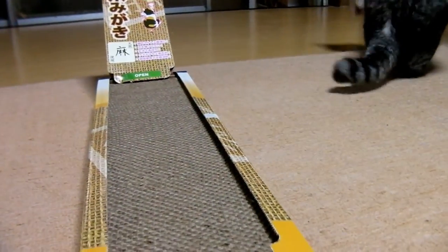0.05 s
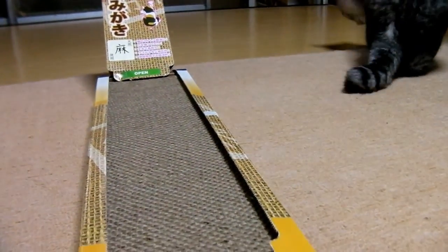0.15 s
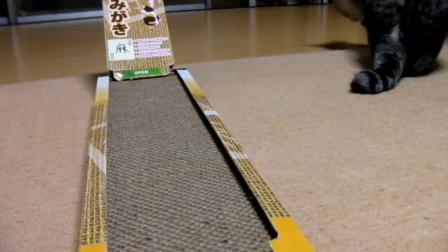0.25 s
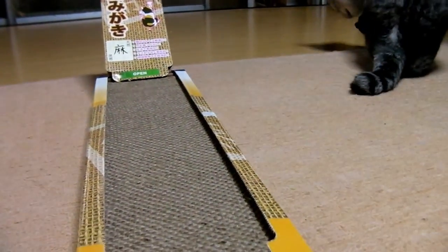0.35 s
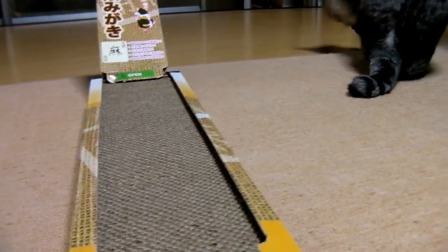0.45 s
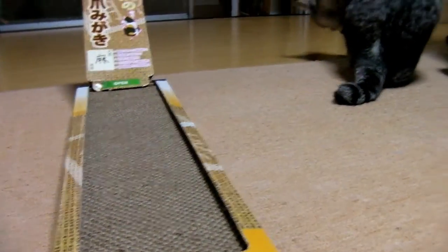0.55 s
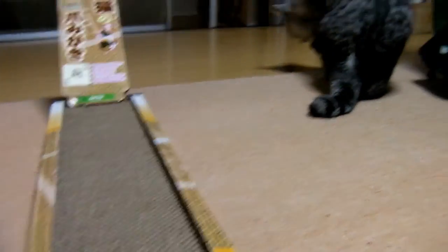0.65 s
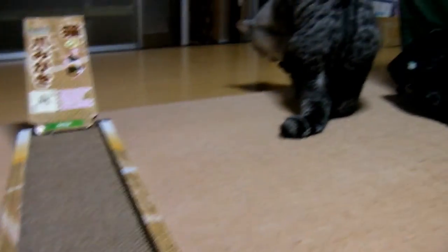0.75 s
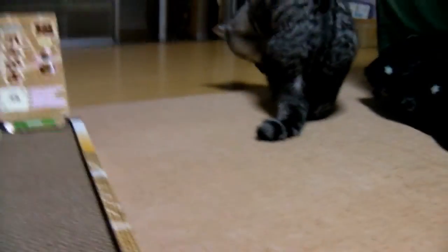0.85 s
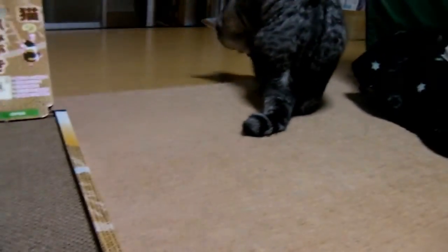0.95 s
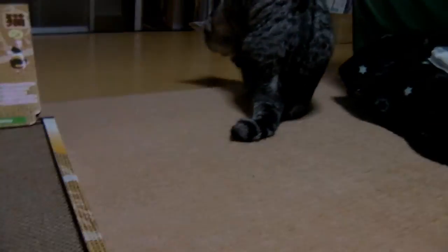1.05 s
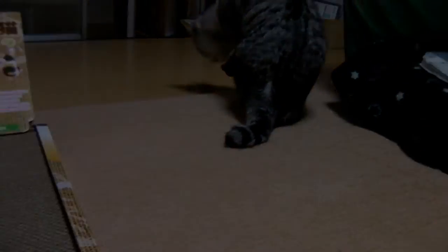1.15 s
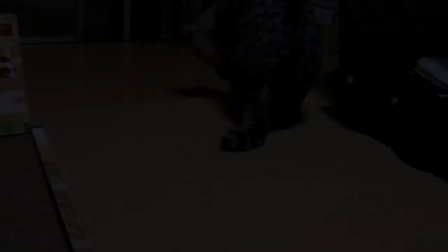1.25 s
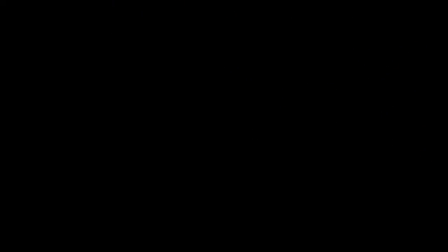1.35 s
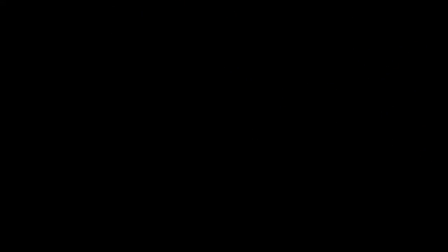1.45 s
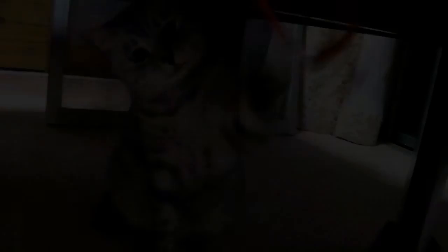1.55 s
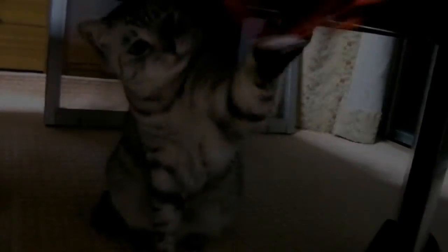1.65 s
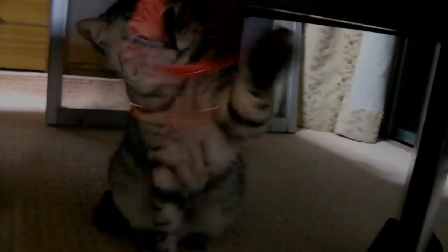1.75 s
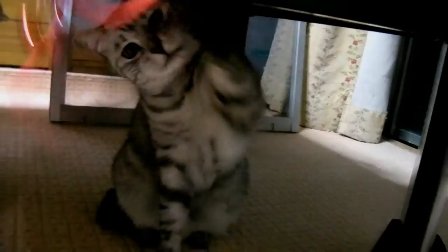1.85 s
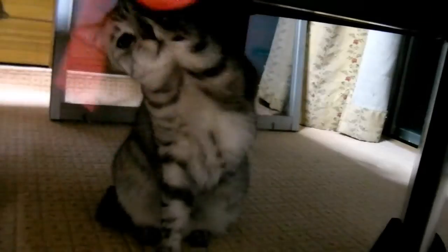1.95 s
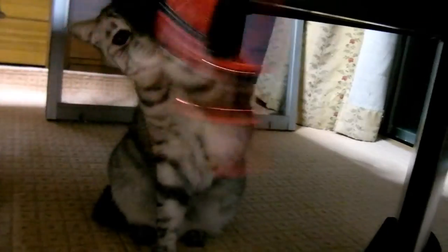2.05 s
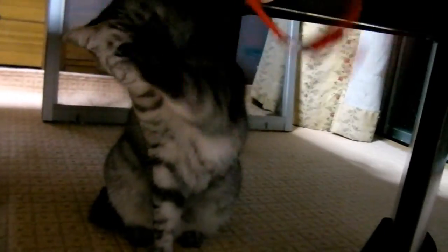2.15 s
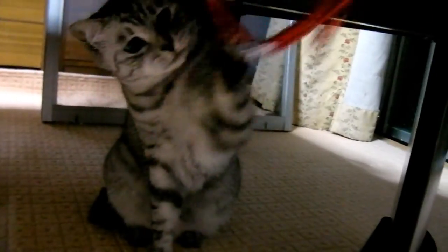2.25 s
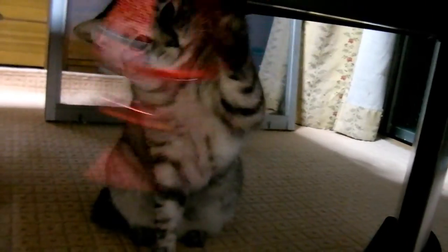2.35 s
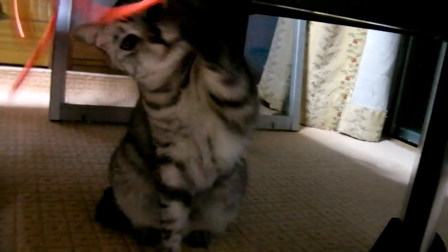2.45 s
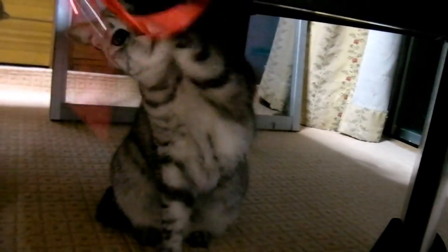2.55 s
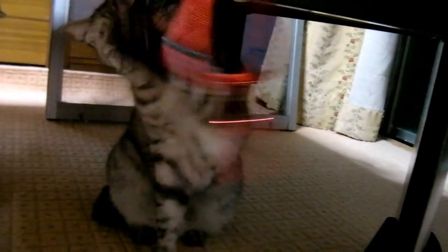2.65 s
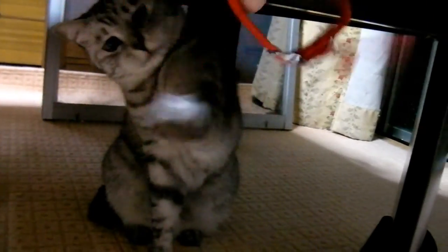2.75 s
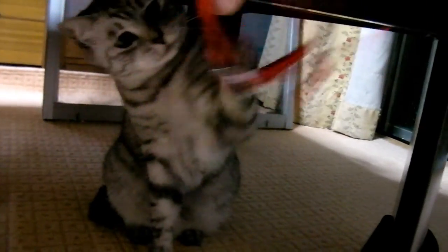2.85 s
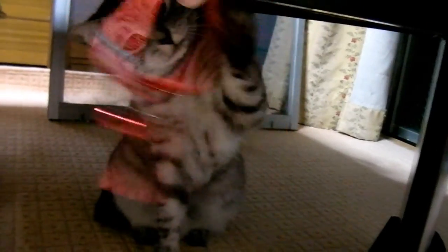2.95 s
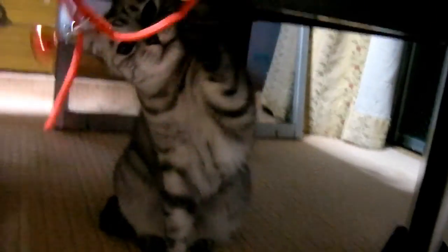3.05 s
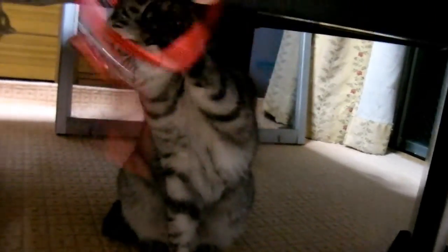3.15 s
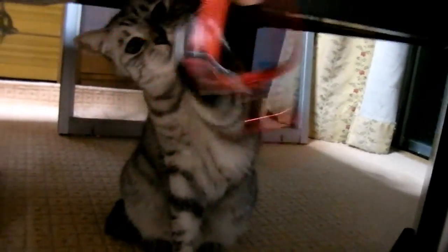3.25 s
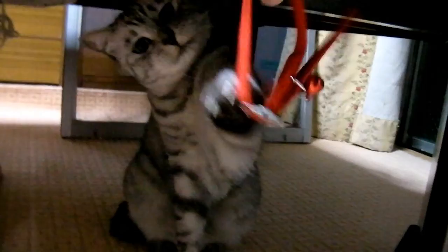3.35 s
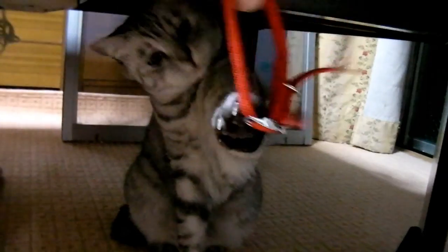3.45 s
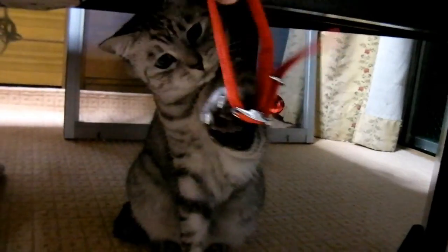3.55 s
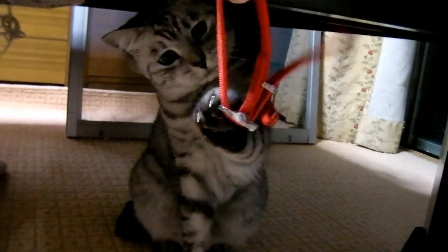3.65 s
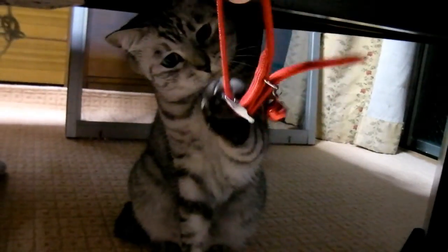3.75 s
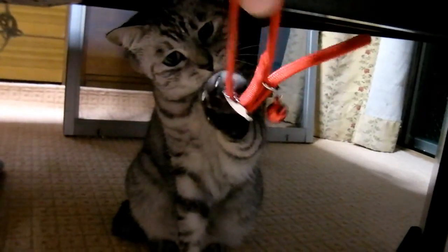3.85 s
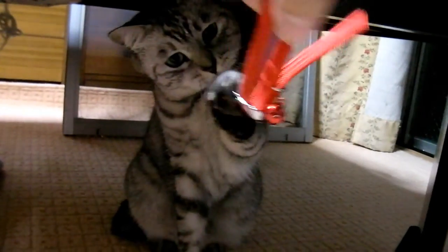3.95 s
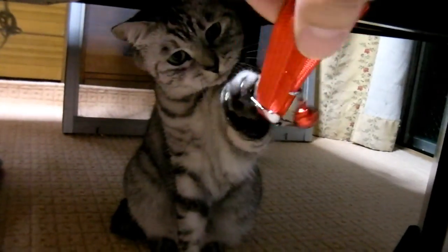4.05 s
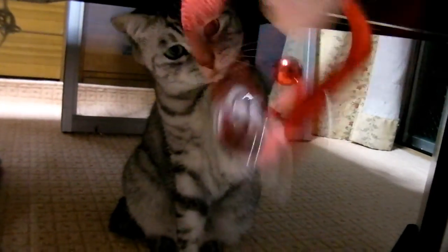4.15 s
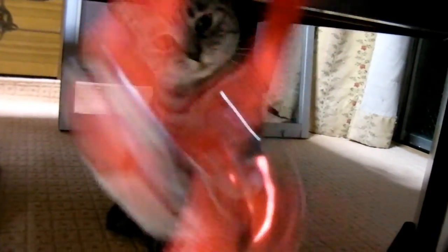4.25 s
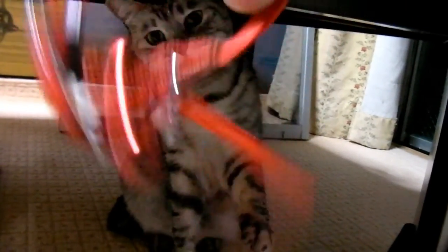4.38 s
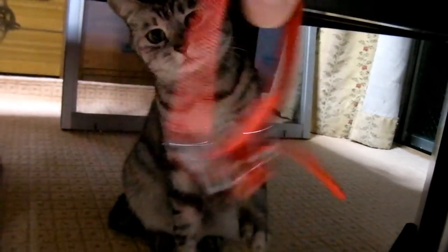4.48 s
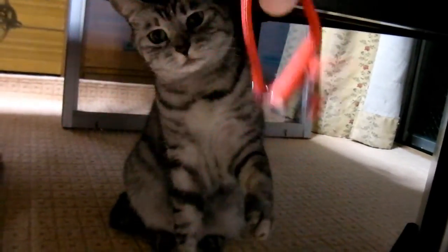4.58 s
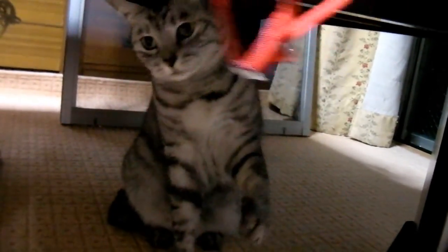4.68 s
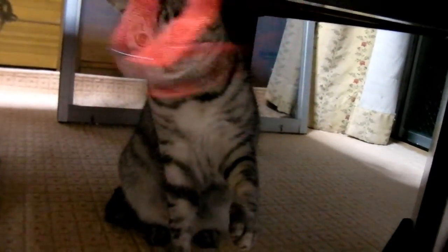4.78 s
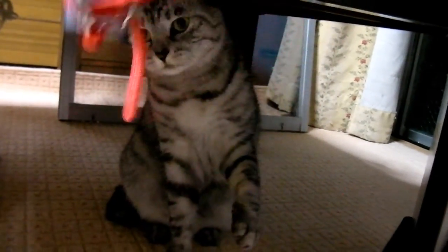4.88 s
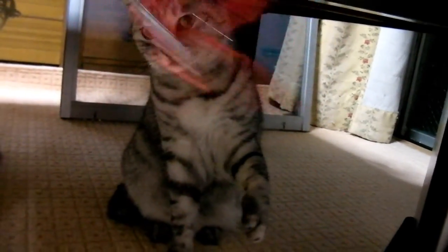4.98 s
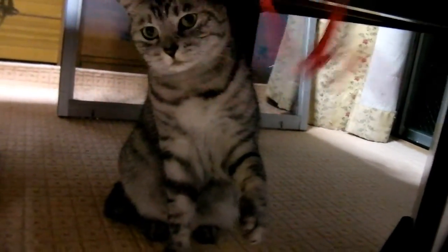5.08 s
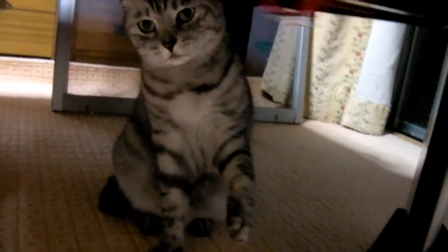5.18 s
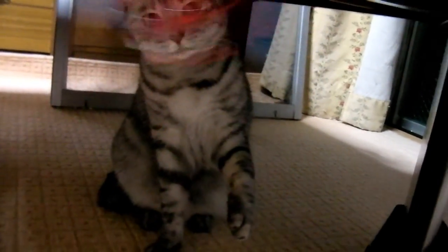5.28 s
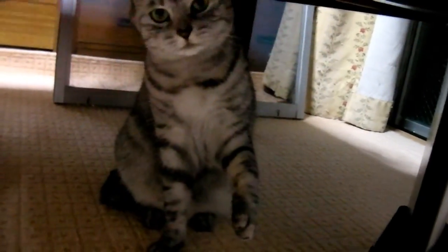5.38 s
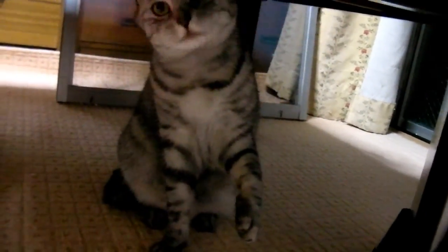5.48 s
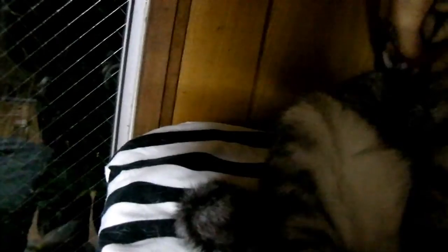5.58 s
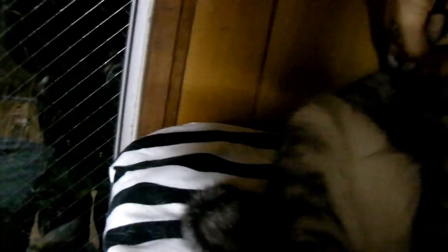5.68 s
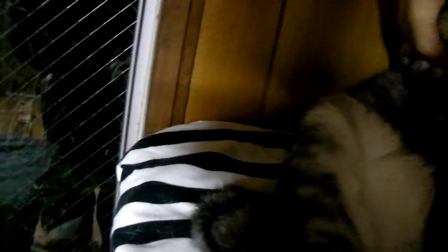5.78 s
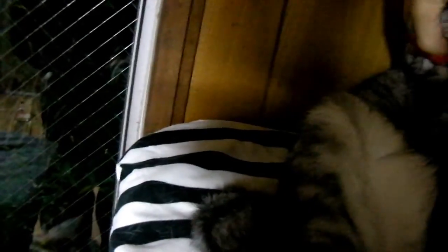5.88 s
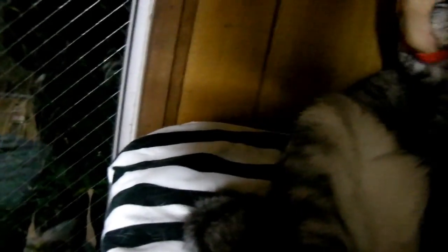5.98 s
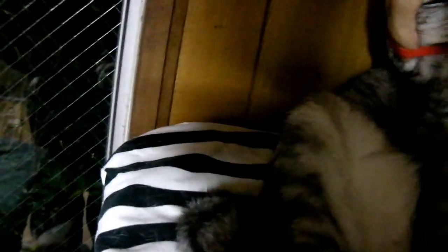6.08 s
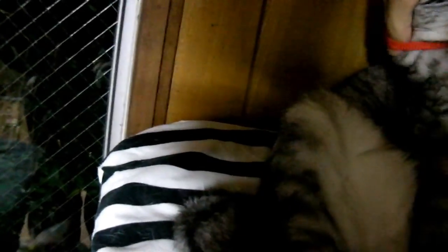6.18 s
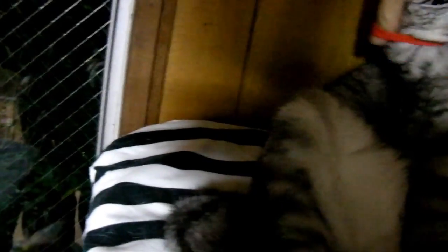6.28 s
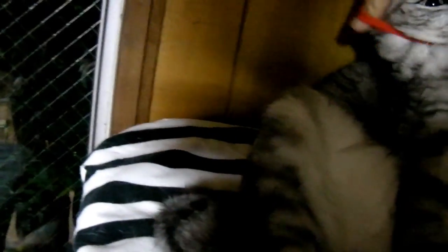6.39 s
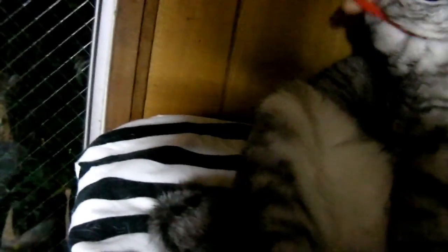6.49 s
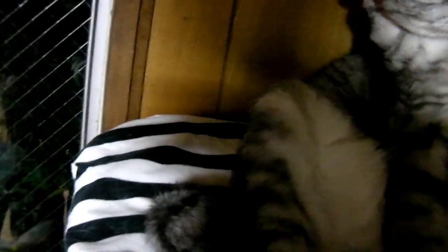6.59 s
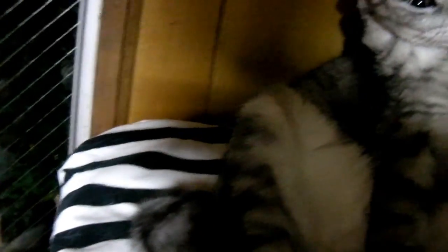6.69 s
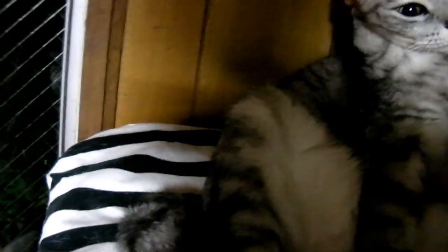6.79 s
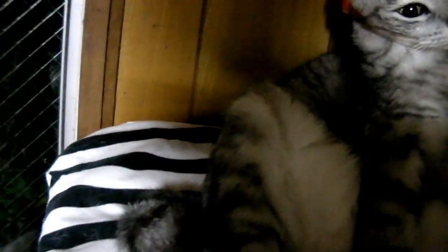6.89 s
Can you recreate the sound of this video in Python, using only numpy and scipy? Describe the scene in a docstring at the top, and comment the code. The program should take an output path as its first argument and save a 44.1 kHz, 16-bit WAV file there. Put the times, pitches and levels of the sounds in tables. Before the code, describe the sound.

For the first 1.5 seconds there is only a quiet room: steady soft hiss, lumpy low rumble with small pops, and faint dull bumps near 0.1 and 1.1. A faint bell touch at 1.2 leads to light jingling at 1.55-1.9, with a claw tick at 1.8. The small slit bell, close and bright around 4.4 kHz with higher shimmer, jingles sharply at 2.1-2.3, again at 2.7-2.85, then 3.4-3.75, its pellet rattling and choking the ring. Scratchy claw ticks accompany it. The longest, loudest shake runs 4.3-4.75, with a very hard, overloaded strike at 4.41. Another burst comes at 5.0-5.1, light touches follow, then a sharp clink at 5.56 and a woody knock at 5.6. Afterwards rumble swells at 5.75, with muffled bumps around 5.9 and 6.7, one very faint bell touch at 6.0, and hiss to 7 seconds.

```python
"""Hiss and a lumpy rumble in a quiet room, dull bumps, then a small slit bell shaken close by.
A cat swipes at it: claws tick on the strap, something knocks on wood.
Bell: each touch of the loose pellet resets decaying shell modes, with ticks, bounces and rattle.
Floor: shaped noise plus low pops. Scratches, bumps: dying noise bands. Wood: struck resonators.
A short noise tail is the room; loud rings overload the microphone."""
import sys
import numpy as np
from scipy import signal
from scipy.fft import rfft, irfft
from scipy.io import wavfile
from scipy.ndimage import uniform_filter1d

SR = 44100
rng = np.random.default_rng(int(sys.argv[2]) if len(sys.argv) > 2 else 0)


def undo_db(level):
    """Turn decibels back into plain size, where 20 dB means ten times bigger."""
    steps = np.asarray(level, float) / 20
    return 10 ** steps


def put_to_file(sound):
    """Save the sound as 16-bit audio at rate SR, in the file named by the first command-line argument."""
    columns = np.atleast_2d(sound).T  # one column per channel
    safe = np.clip(columns, -1, 1)
    whole_steps = np.round(safe * 32767)
    wavfile.write(sys.argv[1], SR, whole_steps.astype(np.int16))


N = 305454

# floor levels over time: t/s, rumble level/dB, hiss level/dB
FLOOR_LEVELS = [(0.0, -58.5, -51), (0.5, -57, -51), (0.98, -53, -50.5), (1.66, -63, -55.5),
                (1.97, -62.5, -51.5), (3.26, -58.5, -50.5), (3.55, -63.5, -52.5), (3.95, -56.5, -51),
                (4.3, -59.5, -51), (4.44, -78, -58.5), (4.65, -71, -54), (5.03, -59, -52),
                (5.55, -63.5, -50.5), (5.77, -52, -49), (6.27, -59, -50.5), (6.93, -55.5, -50.5)]
# relative spectrum of the rumble: f/Hz, density/dB
RUMBLE_SPECTRUM = [(12, -41.5), (20, -14), (118, 1), (258, -5.5), (329, -13), (362, -8), (500, -13),
                   (650, -41), (1100, -120)]
# relative spectrum of the hiss: f/Hz, density/dB
HISS_SPECTRUM = [(200, -10), (400, 1), (1000, 0.5), (2500, -2), (4200, -3.5), (5500, -11), (7000, -11.5),
                 (7800, -21.5), (8600, -12.5), (9500, -14.5), (12000, -17.5), (15500, -17)]
# left-right correlation of the floor noise: f/Hz, correlation/1
CORRELATION = [(30, 0.36), (150, 0.35), (400, 0.24), (2000, 0.077), (6000, 0.29), (15000, .1)]
# knocks on wood: t/s, level/dB
WOOD_KNOCKS = [(5.598, -28), (5.604, -37.5), (5.61, -38)]
# wood modes: f/Hz, level re knock/dB, t60/s
WOOD_MODES = [(887, 7, 0.05), (1100, -3, 0.088), (1284, -6, 0.044), (1670, -5, 0.076), (2090, 4, 0.025),
              (2695, -6, 0.08), (3910, 5.5, 0.031)]
# dull bumps, and the low thump of the hardest bell strike at 4.414 s:
# t/s, rms level at start/dB, centre f/Hz, width/octaves
DULL_BUMPS = [(0.1, -50, 1000, 0.46), (1.079, -49, 1000, .6), (2.8, -42.5, 1000, 1.5),
              (4.414, -28, 800, 2.6), (5.598, -26.5, 1919, 2.07), (5.679, -42, 1925, 1.78),
              (5.75, -48, 300, 1.9), (5.913, -37.5, 452, 2.7), (5.951, -45, 450, 1.5),
              (6.642, -39.5, 550, 1.6), (6.728, -44.5, 502, .84), (6.868, -48.5, 500, 1.3)]
# claw scratches, and the bright tick of the bell strike at 5.562 s:
# t/s, rms level at start/dB, centre f/Hz, width/octaves, t60/s
SCRATCHES = [(1.799, -23, 3800, .59, 0.017), (2.114, -25.5, 3780, .64, 0.055),
             (2.134, -31.5, 3280, 1.22, 0.051), (2.768, -38.5, 4000, 1.08, .14),
             (3.421, -43, 5960, 1.77, 0.024), (3.614, -41.5, 2680, 0.51, .031),
             (4.278, -34, 3550, 2.2, .026), (4.338, -40.5, 7960, 1.45, 0.016),
             (4.356, -35, 7086, 1.16, 0.024), (5.562, -22, 10900, 1.2, 0.011)]
# brighter tick and low body of every scratch: level re scratch/dB, centre f/Hz, width/octaves, t60/s
SCRATCH_EXTRAS = [(-15, 7800, 1.9, .02), (-23, 1500, 2.1, .08)]
# pellet strikes the shell: t/s, main ring level/dB, main t60/s, second ring level/dB, treble rings level/dB
PELLET_STRIKES = [(1.219, -47, 0.068, -68, -80), (1.5385, -35.5, 0.089, -60, -77),
                  (1.566, -46.5, .06, -61, -78.5), (1.5754, -33.5, 0.029, -62, -74),
                  (1.5864, -38, 0.078, -62, -77), (1.6283, -37.5, 0.11, -42.5, -78.5),
                  (1.6438, -21, 0.02, -40.5, -71), (1.6657, -27.5, 0.019, -44, -56),
                  (1.6712, -25.5, 0.049, -47, -57), (1.8104, -33, 0.028, -53.5, -77),
                  (1.8184, -33, .025, -56, -75.5), (1.8792, -37.5, .03, -61, -81),
                  (1.9206, -43, 0.034, -50, -79), (2.1142, -28.5, 0.054, -58, -65),
                  (2.1436, -26, 0.11, -32, -51), (2.1531, -13.5, 0.031, -34.5, -38.5),
                  (2.1596, -20, .025, -24, -44), (2.1651, -15.5, .013, -29.5, -56.5),
                  (2.1681, -32, 0.087, -30, -54), (2.1955, -32.5, .4, -45, -50.5),
                  (2.2085, -8, 0.028, -32.5, -31), (2.214, -13.5, 0.13, -27.5, -47.5),
                  (2.2439, -33.5, .2, -44, -58), (2.2499, -20.5, .34, -47, -47),
                  (2.2634, -18, 0.044, -51, -59), (2.2823, -39, 0.13, -56.5, -77),
                  (2.369, -40, .4, -61.5, -78), (2.4035, -42, .07, -65, -76),
                  (2.411, -29, 0.034, -57, -77.5), (2.4415, -33, 0.44, -54, -75),
                  (2.4819, -49, 0.092, -69, -78.5), (2.5811, -37.5, 0.016, -57.5, -79),
                  (2.606, -46, 0.044, -65.5, -82), (2.7054, -20.5, 0.029, -33, -55),
                  (2.7093, -15.5, .023, -33, -53.5), (2.7173, -24, 0.051, -41.5, -49),
                  (2.7323, -37, 0.24, -48.5, -56.5), (2.7812, -20.5, 0.34, -33, -43.5),
                  (2.7875, -9, .035, -22.5, -42.5), (2.7936, -9, 0.024, -33.5, -36.5),
                  (2.7997, -4.5, 0.42, -24, -27), (2.8096, -5.5, 0.013, -26, -36),
                  (2.8136, -11, 0.028, -21.5, -36.5), (2.8263, -18.5, .036, -36, -57.5),
                  (2.8485, -32.5, .15, -58.5, -68.5), (2.9668, -37, .3, -48.5, -78),
                  (2.9703, -23, .03, -49, -75), (3.0032, -35, 0.064, -65.5, -74.5),
                  (3.316, -48, 0.043, -69, -79.5), (3.340, -47.5, .03, -62.5, -80),
                  (3.377, -47.5, 0.034, -65, -77), (3.395, -44, 0.049, -67, -82),
                  (3.4227, -29.5, 0.025, -42, -64), (3.451, -31.5, 0.02, -51, -59.5),
                  (3.4706, -17.5, .012, -45.5, -65), (3.4876, -31.5, 0.013, -46.5, -77.5),
                  (3.521, -42, 0.064, -47, -76.5), (3.544, -25, .17, -50.5, -58),
                  (3.5615, -11.5, 0.013, -29, -65), (3.5652, -16, 0.14, -45, -52),
                  (3.6054, -11.5, 0.057, -33, -43.5), (3.6146, -10.5, .03, -34, -36.5),
                  (3.6208, -9, 0.031, -38.5, -45), (3.6263, -21.5, .34, -45.5, -50),
                  (3.6412, -16.5, .12, -36.5, -42), (3.6507, -14.5, .14, -45, -49.5),
                  (3.6618, -12, 0.089, -42, -42.5), (3.6941, -24.5, 0.053, -49.5, -54.5),
                  (3.7156, -28, 0.19, -44, -57), (3.7475, -31, 0.55, -51.5, -58.5),
                  (3.7599, -17.5, 0.033, -54.5, -66.5), (4.2875, -26.5, 0.015, -40, -68.5),
                  (4.3017, -37.5, 0.029, -43, -67.5), (4.317, -39.5, .13, -42, -69),
                  (4.3257, -16, .019, -40.5, -67.5), (4.3401, -22.5, 0.021, -37, -65.5),
                  (4.3564, -25, 0.045, -30, -59.5), (4.3624, -17, 0.8, -17, -41),
                  (4.3724, -3, .009, -40, -45.5), (4.3774, -11, .19, -20, -43),
                  (4.3893, -17, 0.11, -45.5, -46), (4.407, -27.5, 0.35, -28, -38),
                  (4.4135, 10.5, .13, -23.5, -36), (4.429, -6, .022, -22.5, -32),
                  (4.4363, -9.5, .045, -26, -37), (4.4449, -10, 0.23, -24, -42),
                  (4.4559, -6, .032, -30, -53), (4.4748, -19.5, .04, -36.5, -57),
                  (4.5088, -3, 0.057, -33, -34.5), (4.5127, -6.5, 0.28, -22, -39),
                  (4.5195, -6.5, .04, -23.5, -39.5), (4.5256, -16, 0.12, -27, -35),
                  (4.5921, -12.5, 0.13, -34, -36.5), (4.6035, -16, .055, -41, -40),
                  (4.6163, -15, 0.043, -21.5, -56.5), (4.6277, -10.5, 0.027, -34.5, -48),
                  (4.6471, -14, 0.058, -23, -41.5), (4.6737, -12.5, .015, -32, -38),
                  (4.6771, -22, .4, -31.5, -46), (4.7003, -11.5, 0.037, -30.5, -48),
                  (4.7138, -15.5, 0.14, -31.5, -44), (4.7333, -13, 0.047, -47.5, -51.5),
                  (4.7722, -36.5, .089, -63.5, -79.5), (4.9697, -33, 0.023, -75, -74.5),
                  (4.9847, -13, 0.36, -42, -49.5), (4.9931, -12.5, 0.013, -47, -66.5),
                  (5.0247, -30.5, 0.73, -43, -57.5), (5.0275, -11.5, .05, -31.5, -53.5),
                  (5.0365, -6.5, .02, -35, -42), (5.0405, -12.5, 0.12, -35.5, -38),
                  (5.047, -13, .07, -51, -39.5), (5.064, -17, 0.049, -40.5, -53),
                  (5.077, -20, .047, -51.5, -62), (5.0875, -28, 0.032, -50, -70.5),
                  (5.0914, -45, 0.27, -61.5, -74.5), (5.1259, -48.5, .25, -66.5, -78),
                  (5.2955, -36, .03, -47.5, -67), (5.371, -47, 0.056, -68, -80),
                  (5.392, -46, .03, -66, -80), (5.4648, -21.5, .03, -49.5, -65),
                  (5.491, -47, .17, -59.5, -78), (5.515, -36, .03, -58, -77),
                  (5.5215, -29.5, 0.13, -52, -72), (5.5616, -1.5, 0.091, -51, -38.5),
                  (5.593, -20, 0.45, -25, -47), (5.6112, -22, 0.036, -30, -54),
                  (5.6297, -29.5, 0.058, -53.5, -59.5), (6.0163, -43.5, .13, -60, -77)]
# the ring suddenly drops: t/s, main ring loss/dB
RING_DROPS = [(1.548, 11.5), (1.683, 6), (2.2254, 21), (2.2728, 9.5), (2.3741, 15.5), (2.4493, 25),
              (2.8018, 20), (3.675, 7), (4.382, 18), (4.9881, 42), (5.0006, 20), (5.0311, 33), (5.4681, 15),
              (5.3049, 20), (1.8827, 18), (1.924, 16), (5.5306, 11.5), (5.581, 8), (4.6657, 12),
              (4.7472, 14), (5.662, 20), (1.6902, 13.5), (4.5856, 4)]
# spells without random nudges: start t/s, end t/s
NUDGE_FREE_SPELLS = [(3.566, 3.604), (4.414, 4.428), (4.527, 4.585), (4.984, 5.04), (5.562, 5.58)]
# bell swings and turns: t/s, left minus right level/dB, mean lower minus upper treble ring level/dB,
# top mode minus main ring level/dB
BELL_SWING = [(1.6, 1.5, 3, -45.5), (2.15, 1.5, -9.5, -45.5), (2.22, 1, 0, -44.5), (2.699, 3, 16.5, -45),
              (2.82, 1, -2.5, -45), (3.0, -3, -0.5, -46.5), (3.56, -3.5, -2, -44), (3.68, -1, 15.5, -46),
              (3.749, -1.5, -10, -45.5), (4.36, -3, -7.5, -45), (4.41, -6, 17, -46), (4.44, -6, -5.5, -46),
              (4.52, -3.5, -10, -46), (4.721, -1.5, -11, -40), (5.0, 2, -14.5, -24), (5.06, 2.5, 1, -28),
              (5.41, -0.5, 0.5, -32), (5.56, 3.5, -3, -27.5), (6.0, -2.5, 0.5, -30)]
# shell modes besides the main one: f/Hz
SHELL_MODE_HZ = [4885, 4965, 10620, 11755, 7855, 8400, 9370, 545, 13150]
# same modes: level re driving column/dB, longest t60/s
SHELL_MODES = [(-1, 0.39), (-9, 0.06), (3.5, 0.2), (4.5, 0.21), (-18, .15), (-41, 0.11), (-41, 0.059),
               (-41.5, .12), (0, 0.027)]
# same modes: index of the driving column of touches()
SHELL_DRIVER = [3, 3, 4, 5, 5, 1, 1, 1, 6]


def rms_one(x):
    """Scale to unit rms."""
    return x / np.sqrt(np.mean(x ** 2) + 1e-20)


def in_time(rows):
    """Interpolate the columns of a time table at every sample."""
    s, *columns = np.transpose(rows)
    return [np.interp(np.arange(N) / SR, s, c) for c in columns]


def at_hz(points, hz):
    """Read a spectrum on a log frequency axis."""
    points_hz, values = np.transpose(points)
    return np.interp(np.log(hz), np.log(points_hz), values)


def drift(rate_hz, step=40):
    """Low-passed noise of unit rms, computed every step samples."""
    r = np.exp(-2 * np.pi * step * rate_hz / SR)
    noise = rng.standard_normal(N // step + 2002)
    slow = signal.lfilter([1], [1, -2 * r, r * r], noise)[2000:]
    return np.interp(np.arange(N) / step, np.arange(len(slow)), rms_one(slow))


def band(x, low_hz, high_hz):
    """Band-pass."""
    edges_hz = np.clip([low_hz, high_hz], 10, .47 * SR)
    return signal.sosfilt(signal.butter(2, edges_hz, "band", fs=SR, output="sos"), x)


def coloured(spectrum, patchy_db, flicker_hz):
    """Stereo noise of given spectrum and left-right correlation, level wandering; rms 1."""
    hz = np.maximum(np.arange(N // 2 + 1) * SR / N, 1)
    mid, side = rfft(rng.standard_normal((2, N)))
    alike = np.clip(at_hz(CORRELATION, hz), 0, 1)
    both = np.sqrt(1 + alike) * mid + np.sqrt(1 - alike) * side * [[1], [-1]]
    noise = irfft(both * undo_db(at_hz(spectrum, hz)), N)
    return rms_one(noise * undo_db(patchy_db * drift(flicker_hz)))


def pops():
    """Band-passed random impulses, partly shared by both sides: soft low pops; rms 1."""
    rate_per_s = 40
    size_db = 3 * np.minimum(rng.exponential(1, (3, N)), 3)
    born = (rng.random((3, N)) < rate_per_s / SR) * undo_db(size_db)
    return rms_one(band(born[0] + 0.68 * born[1:], 56.0, 450))


def floor_noise():
    """Lumpy rumble (noise and pops) and hiss, each following its own level curve."""
    rumble_db, hiss_db = in_time(FLOOR_LEVELS)
    rumble = coloured(RUMBLE_SPECTRUM, patchy_db=4.5, flicker_hz=18.0) + undo_db(-3.5) * pops()
    hiss = coloured(HISS_SPECTRUM, patchy_db=0.4, flicker_hz=9.06)
    return undo_db(rumble_db) * rumble + undo_db(hiss_db) * hiss


def room(x):
    """Convolve with a short decaying noise tail, independent per side."""
    t60_s, gap_s = 0.246, .003
    t = np.arange(int(.3 * SR)) / SR
    tail = rng.standard_normal((2, len(t))) * undo_db(-60 * t / t60_s) * (t > gap_s)
    tail /= np.sqrt(np.sum(tail ** 2, axis=1, keepdims=True))
    return signal.fftconvolve(x[None], tail, axes=1)[:, :N]


def knocks():
    """Each knock excites every wood resonance, with a random strength for each."""
    out = np.zeros(N)
    s, knock_db = np.transpose(WOOD_KNOCKS)
    at = (s * SR).astype(int)
    for hz, level_db, t60_s in WOOD_MODES:
        clicks = np.full(N, 1e-18)
        clicks[at] = undo_db(knock_db + level_db + rng.normal(0, 0.8, len(at)))
        r, w = undo_db(-60 / (t60_s * SR)), 2 * np.pi * hz / SR
        out += signal.lfilter([0, np.sin(w)], [1, -2 * r * np.cos(w), r * r], clicks)
    return band(out, 1070, 5300)   # a small thing radiates no bass


def puffs(rows):
    """Exponentially dying noise bands: t/s, level/dB, f/Hz, width/octaves, t60/s."""
    out = np.zeros(N)
    t = np.arange(int(.2 * SR)) / SR
    for s, start_db, hz, octaves, t60_s in rows:
        at = int(s * SR)
        half = 2 ** (octaves / 2)
        puff = rms_one(band(rng.standard_normal(len(t)), hz / half, hz * half))
        out[at:at + len(t)] += (puff * undo_db(start_db - 60 * t / t60_s))[:N - at]
    return out


def bumps():
    """Dull bumps and one strike's low thump: noise bands sharing one decay."""
    t60_s = 0.0764
    return puffs([(*bump, t60_s) for bump in DULL_BUMPS])


def scratches():
    """Claw scratches and one strike's bright tick: a noise band plus a tick and a low body."""
    extras = [(row[0], row[1] + db, *shape) for row in SCRATCHES for db, *shape in SCRATCH_EXTRAS]
    return puffs(list(SCRATCHES) + extras)


def left_at(rows, s):
    """What the preceding touch has left ringing at times s: main dB, its t60, other rings dB."""
    shell_t60_s = 0.18
    before = rows[np.maximum(np.searchsorted(rows[:, 0], s) - 1, 0)]
    since = s - before[:, 0]
    main_t60 = before[:, 2]
    shell_db = before[:, 3:] - 60 * (since / np.minimum(shell_t60_s, 10.0 * main_t60))[:, None]
    return before[:, 1] - 60 * since / main_t60, main_t60, shell_db


def joined(rows, *columns):
    """Add rows in time order."""
    rows = np.r_[rows, np.column_stack(columns)]
    return rows[np.argsort(rows[:, 0])]


def add_drops(rows):
    """The main ring suddenly drops, the others take a share of the loss."""
    dropped_t60_s, shell_share = .2, 0.55
    s, loss_db = np.transpose(RING_DROPS)
    main_db, _, shell_db = left_at(rows, s)
    shell_db = shell_db - shell_share * loss_db[:, None]
    return joined(rows, s, main_db - loss_db, np.full(len(s), dropped_t60_s), shell_db)


def add_nudges(rows):
    """Light touches at random moments outside the nudge-free spells shift the ring levels."""
    count, main_mean_db, main_spread_db = 260, -2, 3.0
    shell_mean_db, shell_spread_db = -3.5, 5.5   # mostly rob the other rings
    s = rng.uniform(1.55, 6.1, count)
    s = s[np.searchsorted(np.ravel(NUDGE_FREE_SPELLS), s) % 2 == 0]
    jump = rng.standard_normal((len(s), 3))
    main_db, t60, shell_db = left_at(rows, s)
    main_db = main_db + main_mean_db + main_spread_db * jump[:, 0]
    shell_db = shell_db + shell_mean_db + shell_spread_db * jump[:, 1:]
    return joined(rows, s, main_db, t60, shell_db)


def touches():
    """Strikes, drops, nudges: t/s, main/dB, t60/s, second/dB, lower, upper treble/dB, top mode/dB."""
    treble_spread_db = 5   # one touch feeds the two treble rings unevenly
    rows = np.array(sorted(PELLET_STRIKES))
    rows[:, 2] = np.clip(rows[:, 2], .005, 1)
    rows = add_nudges(add_drops(rows))
    s, _, tilt_db, top_db = np.transpose(BELL_SWING)
    tilt_db = np.interp(rows[:, 0], s, tilt_db) + rng.normal(0, treble_spread_db, len(rows))
    top_db = rows[:, 1] + np.interp(rows[:, 0], s, top_db)
    return np.c_[rows[:, :4], rows[:, 4] + tilt_db / 2, rows[:, 4] - tilt_db / 2, top_db]


def change(rows, level_db, t60):
    """How much of the ring each touch replaces, 0-1."""
    gap_s = np.r_[np.diff(rows[:, 0]), 0]
    left_db = np.r_[-99, (level_db - 60 * gap_s / t60)[:-1]]
    return 1 - undo_db(-np.abs(level_db - left_db))


def mode(rows, last, since, hz, level_db, t60, touch_s):
    """One complex decaying mode, reset by each touch; light touches hardly turn its phase."""
    turn = np.pi * rng.uniform(-1, 1, len(rows))
    phase = np.cumsum(turn * change(rows, level_db, t60) ** 0.63)
    state = undo_db(level_db[last] - 60 * since / t60[last]) * np.exp(1j * phase[last])
    state = (last >= 0) * state
    r = np.exp(-1 / (touch_s * SR))   # a touch takes a moment
    return signal.lfilter([1 - r], [1, -r], state) * np.exp(2j * np.pi * np.cumsum(hz) / SR)


def main_ring(rows, last, since, hard, t60):
    """Main mode: a pressing pellet damps and stiffens it; a hard touch starts sharp and relaxes."""
    loose_hz, stiffen_hz, loose_t60_s = 4434, 197.5, 0.021
    press_hz, press_s = 1000, 0.00044
    rising = np.r_[True, np.diff(rows[:, 1]) > -3]
    hz = loose_hz + stiffen_hz * np.exp(-t60[last] / loose_t60_s)
    hz += press_hz * (hard * rising)[last] * np.exp(-since / press_s)
    return mode(rows, last, since, hz, rows[:, 1], t60, touch_s=0.00058)


def shell_rings(rows, last, since, apart, t60, rough):
    """Other modes, shorter when touches crowd; high ones reach the sides in differing phase."""
    crowded_share = 0.43   # of t60, kept when the next touch comes at once
    out = np.zeros((2, N))
    turning = .4 + .25 * drift(5.0)
    for hz, (level_db, longest_s), column in zip(SHELL_MODE_HZ, SHELL_MODES, SHELL_DRIVER):
        mode_t60 = np.minimum(longest_s * (crowded_share + (1 - crowded_share) * apart), 6.7 * t60)
        ring = mode(rows, last, since, np.full(N, hz), rows[:, column] + level_db, mode_t60, 0.00073)
        side_phase = turning * (hz / 11000) ** 2 * [[1], [-1]]
        out += np.real(ring * rough * np.exp(1j * side_phase))
    return out


def rolling(last, since, free):
    """Complex noise modulation by the rolling pellet, fading after each touch."""
    depth = (1 - free[last]) * undo_db(-7.0 - 60 * since / 0.25)
    noise = drift(260, step=4) + 1j * drift(220, step=4)
    # contact stiffens: the roughness lies 150 Hz above the ring
    return uniform_filter1d(depth, size=60) * noise * np.exp(2j * np.pi * 150.0 * np.arange(N) / SR)


def touch_ticks(rows, hard):
    """Noise burst per touch: duller part follows the main ring, bright part the treble rings."""
    at, ticks = (rows[:, 0] * SR).astype(int), np.zeros((2, N))
    ticks[0, at] = hard * undo_db(rows[:, 1] + 8.2 * rng.random(len(rows)))
    ticks[1, at] = hard * np.hypot(undo_db(rows[:, 4]), undo_db(rows[:, 5]))
    decay = np.exp(-1 / (0.0012 * SR))
    burst = signal.lfilter([1], [1, -decay], ticks + 1e-18) * rng.standard_normal(N)
    return undo_db(-18.0) * band(burst[0], 4900, 7025) + undo_db(1.5) * band(burst[1], 6780, 16520)


def grains(rate_per_s):
    """Random impulses of Gaussian height."""
    return (rng.random(N) < rate_per_s / SR) * rng.standard_normal(N)


def rattle(rows, last, since, free, t60):
    """Grains shaken out around the main ring, dying with it."""
    level = (last >= 0) * undo_db(rows[last, 1] - 60 * since / t60[last]) * (1 - free[last])
    return undo_db(-2.5) * band(band(grains(900.0) * level, 3950, 5300), 3950, 5300)


def bounces(rows, last, since, apart):
    """Tiny bounces after each touch die out: a mid band, and a treble band of random sign per side."""
    level = (last >= 0) * undo_db(rows[last, 3] - 60 * since / 0.18) * (1 - 0.67 * apart[last])
    hits = grains(1500.0) * level
    mid = undo_db(21.5) * band(band(hits, 4100, 5480), 3800, 5550)
    return mid + undo_db(-1.0) * band(hits * rng.choice([-1, 1], (2, N)), 6040, 16500)


def bell():
    """Each touch sets every mode to a new height and turns its phase; between touches it decays."""
    rows, t = touches(), np.arange(N) / SR
    last = np.searchsorted(rows[:, 0], t) - 1   # -1: not yet touched
    since = np.maximum(t - rows[last, 0], 0)
    t60 = np.clip(rows[:, 2], .005, 1)
    hard = change(rows, rows[:, 1], t60)
    # near 1 when the next touch comes much later than 16 ms
    apart = 1 / (1 + (.016 / np.r_[np.diff(rows[:, 0]) + 1e-4, 1]) ** 4)
    # a hard blow or a long gap leaves the ring cleaner
    free = np.clip(0.1 * hard + 2.1 * undo_db(rows[:, 1]) + 0.36 * apart, 0, .95)
    rough = 1 + rolling(last, since, free)
    out = np.real(main_ring(rows, last, since, hard, t60) * rough)
    out = out + shell_rings(rows, last, since, apart, t60, rough)
    out += touch_ticks(rows, hard) + rattle(rows, last, since, free, t60)
    return out + bounces(rows, last, since, apart)


def scene():
    """Floor, short noises and the bell swinging from side to side, with room tails."""
    pan_db = in_time(BELL_SWING)[0]
    floor = floor_noise()
    hits = knocks() + bumps() + scratches()
    ring = bell()
    near = ring * undo_db(pan_db * [[.5], [-.5]]) + hits
    return near + undo_db(-25.5) * room(ring.mean(axis=0)) + undo_db(-12.0) * room(hits) + floor


def roll_off(x):
    """The treble ends steeply here."""
    return signal.sosfilt(signal.butter(12, 15640, fs=SR, output="sos"), x)


def record(dry):
    """Microphone: cubic bending adds a third harmonic, the loudest ring overloads, then low-pass."""
    limit, stop_hz = .9, 16700
    bent = dry - 0.054 * np.clip(dry, -1.2, 1.2) ** 3
    clipped = limit * np.tanh((np.abs(bent) / limit) ** 2) ** .5 * np.sign(bent)
    mix = signal.sosfilt(signal.cheby2(10, 50, stop_hz, fs=SR, output="sos"), clipped)
    return roll_off(mix)


dry = scene()
out = record(dry)
put_to_file(out)
```